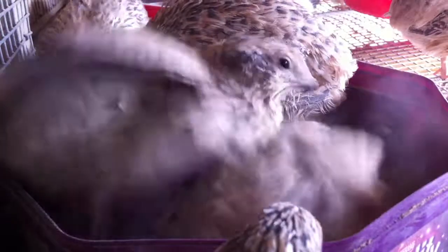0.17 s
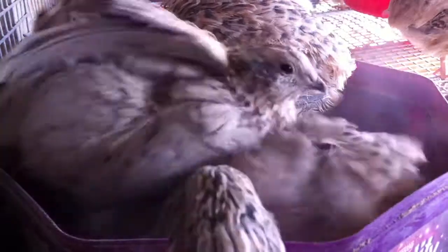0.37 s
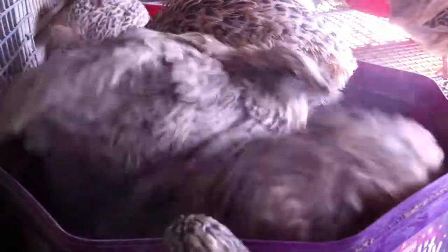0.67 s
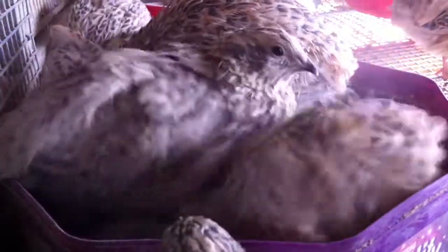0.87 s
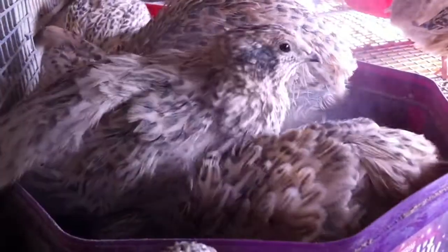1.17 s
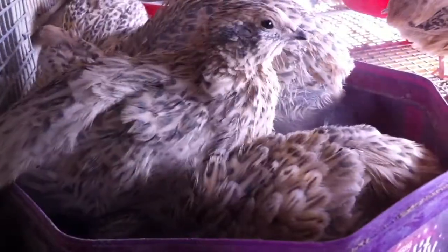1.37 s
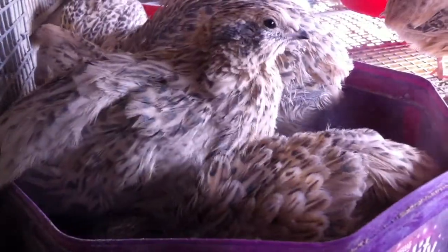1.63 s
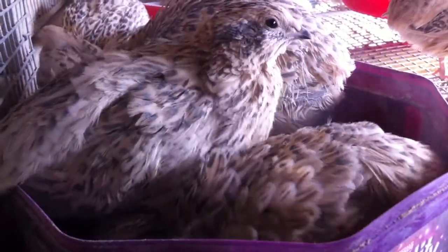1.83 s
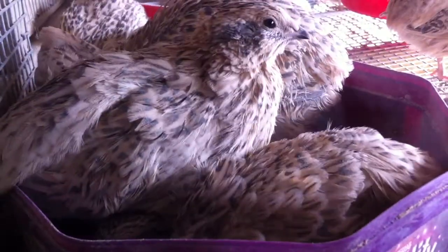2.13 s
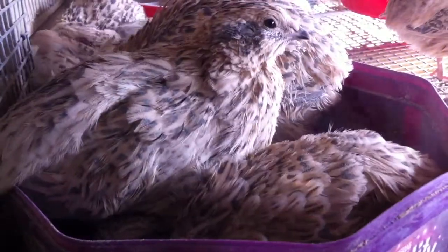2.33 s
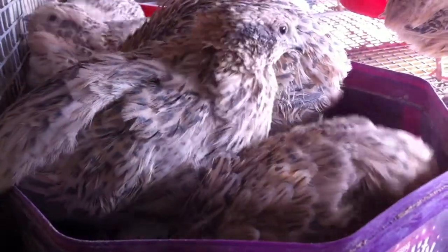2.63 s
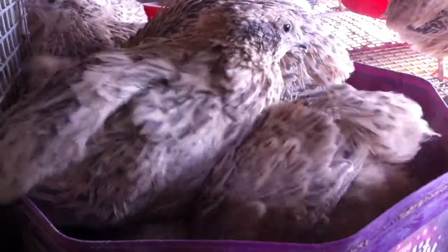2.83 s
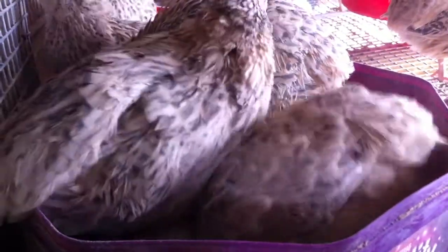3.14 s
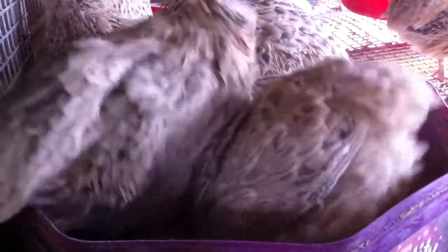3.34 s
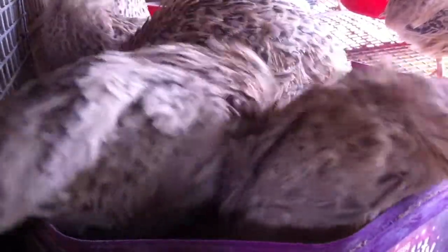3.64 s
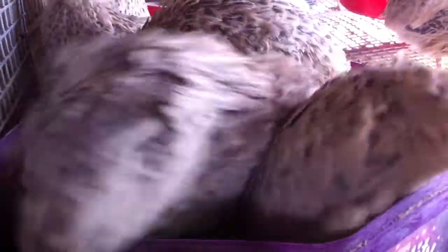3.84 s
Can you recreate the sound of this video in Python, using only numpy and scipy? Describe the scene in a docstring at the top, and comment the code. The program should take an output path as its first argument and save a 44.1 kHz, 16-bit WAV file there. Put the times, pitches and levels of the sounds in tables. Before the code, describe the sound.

Quail claws knock a plastic tub very close by, loudest around 0.1 to 0.35 s, with dry scraping dust and ticking grit continuing unevenly to 1.05 s. Thrown dust patters and fades by 1.5 s. Faint feather brushing follows, with two tiny drooping peeps near 2.25 and 2.35 s. Shuffling resumes from 2.5 s, with clear knocks at 3.0, 3.35 and 3.8 s, over low shed rumble.

```python
"""Claws knock sharply on a plastic tub, close to the microphone, as quail take a quick dust bath.
Dust sweeps and sprays of grit are shaped noise, knocks are short decaying tones with clicks and a dull body,
and thrown dust patters back as grainy noise. A quieter spell of brushing holds two faint, sagging peeps,
then the birds shuffle about, with feathers brushing as bands of grit, more knocks and soft bumps.
The tub rings at its resonances, over the faint stirring of the flock and the low air of the shed."""
import sys
import numpy as np
from scipy import signal
from scipy.fft import rfft, irfft
from scipy.io import wavfile

SR = 44100
rng = np.random.default_rng(int(sys.argv[2]) if len(sys.argv) > 2 else 0)


def transcribe(u):
    """Save the signal u as a 16-bit wav file named by the first command-line argument.

    u: samples, shape (n,) or (channels, n), limited to [-1, 1]; the rate is SR.
    q: integer samples, one column per channel.
    """
    v = np.clip(np.atleast_2d(u).T, -1, 1)
    q = np.round(v * 32767).astype(np.int16)
    wavfile.write(sys.argv[1], SR, q)


N = 176400
TIME = np.arange(N) / SR

# knocks: wall attack, then the claw click's fast decay and its weaker, slower tail
KNOCK_RISE_S, CLICK_T60_S, CLICK_TAIL_DB, CLICK_TAIL_T60_S = 0.00035, 0.014, -27, 0.093
CLAW_SPIKE, CLAW_CRUNCH = 0.25, 0.51  # linear gains
WALL_TOP_RATIO, WALL_HARDNESS = 1.31, 3.7  # both multiply the wall pitch
KNOCK_LOW_CUT_HZ = 226
ROOM_KNOCK_DB, ROOM_T60_S, ROOM_BUILD_S = -8, 0.072, 0.0037
# dust: separate grains, and the unevenness of clumps
GRAINS_PER_S, GRAIN_SPREAD_DB, GRAIN_SHARE = 3500, 3, 0.55  # share of the power
CLUMP_S, CLUMP_DB, SCRAPE_CLUMP_DB, FIZZ_CLUMP_DB = 0.0054, 1.5, 1.4, 1.6
SCRAPE_GRIT, RUSTLE_GRIT = 0.45, 0.6  # linear gains
CRACKLES_PER_S, CRACKLE_DB, CRACKLE_SPREAD_DB, CRACKLE_T60_S = 190, -3, 3, 0.012
SWISH_CATCH_DB, SWISH_CATCH_S = 0.8, 0.0035
# the other sounds
THUD_WIDTH_OCTAVES = 0.42
PEEP_SAG_HZ_PER_S, PEEP_FLUTTER_DB, PEEP_FLUTTER_S = 3400, 1.5, 0.006
TUB_KNOCK_DB, TUB_SWEEP_DB = -6, -5  # how strongly each group drives the tub
STIR_DB, STIR_SWING_DB, STIR_S = -83.5, 7, 0.083  # level of each of three bands
AIR_DB, AIR_DRIFT_DB, AIR_DRIFT_S = -63.5, 1, 0.098
EDGE_HZ = 15850


def amp(db):
    """Decibels to gain."""
    return 10 ** (np.asarray(db) / 20)


def unit(x):
    """Scales to rms 1."""
    return x / np.sqrt(np.mean(x ** 2) + 1e-20)


def add(mix, s, sound):
    """Mixes a sound in at a time in seconds."""
    part = mix[max(round(s * SR), 0):][:len(sound)]
    part += sound[:len(part)]


def spectrum_gain(hz, points):
    """Reads a spectrum's gain between its points, on a log frequency scale."""
    point_hz, point_db = np.transpose(points)
    return amp(np.interp(np.log(hz + 1), np.log(point_hz), point_db))


def colour(x, points):
    """Gives a signal a spectrum, at rms 1."""
    f = np.fft.rfftfreq(len(x), 1 / SR)
    return unit(irfft(rfft(x) * spectrum_gain(f, points), len(x)))


def band(x, hz, width):
    """One broad band, width in octaves, at rms 1."""
    f = np.fft.rfftfreq(len(x), 1 / SR) + 1
    skirt = (1 + 0.5 * (np.log2(f / hz) / width) ** 2) ** 2
    return unit(irfft(rfft(x) / skirt, len(x)))


def wander(span_s):
    """Smooth chance, at rms 1, that changes over about the given span."""
    f = np.fft.rfftfreq(N, 1 / SR)
    slow = np.exp(-(2 * f * span_s) ** 2)
    return unit(irfft(rfft(rng.standard_normal(N)) * slow, N))


def swell(peak, rise, fall):
    """Envelope that climbs 20 dB in the rise time and drops 20 dB in the fall time."""
    before = np.maximum((peak - TIME) / rise, 0) ** 0.92
    after = (TIME - peak) / fall
    return amp(-20 * np.maximum(before, after))


def grit():
    """Dust grains of uneven size over a smooth hiss."""
    struck = rng.random(N) < GRAINS_PER_S / SR
    size_db = GRAIN_SPREAD_DB * np.minimum(rng.exponential(1, N), 4)
    grains = struck * rng.choice([-1, 1], N) * amp(size_db)
    return np.sqrt(GRAIN_SHARE) * unit(grains) + np.sqrt(1 - GRAIN_SHARE) * rng.standard_normal(N)


def crackle():
    """Coarse clods burst one after another, each a sudden, short spray of decaying noise."""
    gaps = rng.uniform(0.3, 1.7, size=2000) / CRACKLES_PER_S
    at = (np.cumsum(gaps) * SR).astype(int)
    strength = amp(CRACKLE_SPREAD_DB * rng.uniform(-0.83, 1, len(at)))
    bursts = np.bincount(at, strength, N)[:N]
    decay = amp(-60 / (CRACKLE_T60_S * SR))
    return unit(signal.lfilter([1], [1, -decay], bursts) * rng.standard_normal(N))


def spike(points, size=4096):
    """A single sharp, minimum-phase impulse with the given spectrum, peak 1."""
    log_gain = np.log(spectrum_gain(abs(np.fft.fftfreq(size, 1 / SR)), points))
    pulse = np.fft.ifft(np.exp(np.conj(signal.hilbert(log_gain)))).real
    return pulse / abs(pulse).max()


def reflections(x):
    """Dense, short echoes from the tub and the cage, drawn afresh for every blow."""
    t = np.arange(len(x)) / SR
    build = 1 - np.exp(-(t / ROOM_BUILD_S) ** 2)
    taps = rng.standard_normal(len(t)) * build * amp(-60 * t / ROOM_T60_S)
    return signal.fftconvolve(x, taps / np.linalg.norm(taps))[:len(x)]


def knocks():
    """Each blow is a short wall tone with a sharp click and a crunch; the knocks are thin in the bass."""
    # claws and bodies knock the tub, and coarse grit ticks against it: start_s, level_db,
    # wall_pitch_hz, ring_t60_s, click_db (relative to the wall, ahead of the claw gains)
    blows = [(.015, -41.5, 1110, 0.024, -11), (0.029, -39, 1320, 0.021, -6.5),
             (0.0818, -19.5, 1054, 0.0061, -5.5), (.0848, -35.5, 930, 0.0091, -10),
             (.0925, -33.5, 626, 0.01, -12), (0.1012, -42, 900, 0.0066, -1), (.171, -36, 1340, 0.0099, -12),
             (.2063, -27, 1370, 0.0044, -1.5), (0.2098, -22.5, 1090, 0.0089, -12.5),
             (0.288, -36, 1320, 0.011, -11), (0.3159, -29, 1230, 0.0068, -7.5),
             (.3205, -32, 650, 0.012, -9.5), (.3325, -32.5, 2260, 0.0042, -0.5),
             (.403, -34, 830, 0.011, -13), (.422, -35, 1090, 0.0078, -12), (.4775, -45, 740, 0.02, -6),
             (0.4978, -39, 1220, .012, -4.5), (.5792, -30, 820, 0.015, -15), (0.654, -46, 900, .018, -4),
             (0.794, -43, 444, 0.047, 0), (0.8095, -41, 1080, 0.015, -5.5), (0.8597, -46.5, 1260, 0.018, 2),
             (0.9301, -39.5, 710, 0.0082, -8.5), (1.005, -33.5, 1460, 0.0057, -18),
             (1.0278, -35.5, 1320, 0.013, 0.5), (1.034, -44, 604, 0.0031, -4),
             (1.171, -35.5, 750, 0.0089, -18), (1.184, -36, 630, 0.0027, -22),
             (2.480, -36.5, 790, 0.0073, -10), (2.6882, -35, 1180, 0.012, -34),
             (2.6968, -39, 1100, 0.0074, -29), (2.7503, -42.5, 612, 0.038, -19),
             (2.7625, -46, 676, 0.021, -19), (2.9813, -49, 1000, 0.01, -21),
             (3.0146, -24.5, 1160, 0.011, -19), (3.025, -37.5, 1040, 0.0052, -9.5),
             (3.189, -49, 1390, .008, -1), (3.199, -49, 1070, 0.024, -13), (3.340, -27, 2210, 0.0019, -6),
             (3.801, -37, 1070, 0.0044, -4.5), (3.8036, -28, 658, 0.021, -9),
             (3.8135, -50, 686, 0.017, -22), (3.842, -51, 710, 0.032, -30),
             (3.879, -45.5, 990, 0.017, -3.5)]
    # click spectrum: frequency_hz, density_db (per Hz, relative)
    click_spectrum = [(100, -78), (800, 14), (1600, -2.5), (2900, 2.5), (3600, -8), (4400, -3.5),
                      (5900, -3.5), (7000, -12.5), (10000, -12), (16000, -27)]
    out, t = np.zeros(N), np.arange(8192) / SR
    snap = amp(-60 * t / CLICK_T60_S) + amp(CLICK_TAIL_DB - 60 * t / CLICK_TAIL_T60_S)
    claw = CLAW_SPIKE * spike(click_spectrum, size=len(t))
    for s, db, hz, t60, click_db in blows:
        flex = (1 - np.exp(-(t / KNOCK_RISE_S) ** 2)) * amp(-60 * t / t60)
        tone = -flex / flex.max() * np.sin(2 * np.pi * hz * t)
        # a harder contact starts more sharply
        top_hz = hz * (WALL_TOP_RATIO + WALL_HARDNESS * amp(click_db) ** 2)
        soften = signal.butter(N=8, Wn=min(top_hz, SR / 3), fs=SR)
        wall = signal.lfilter(*soften, tone)
        crunch = CLAW_CRUNCH * snap * colour(rng.standard_normal(len(t)), click_spectrum)
        blow = amp(db) * (wall + amp(click_db) * (claw + crunch))
        add(out, s, blow + amp(ROOM_KNOCK_DB) * reflections(blow))
    return signal.lfilter(*signal.butter(2, KNOCK_LOW_CUT_HZ, "high", fs=SR), out)


def thuds():
    """The low, dull body of the harder knocks, and soft bumps, as swells of narrow-band noise."""
    # low body of the harder knocks, and soft bumps: peak_s, rise_s, fall_s, level_db, centre_hz
    low_bodies = [(0.083, 0.002, 0.027, -36, 605), (0.219, 0.0059, 0.018, -42, 460),
                  (0.325, 0.023, 0.03, -47.5, 207), (.415, 0.069, 0.11, -51, 178),
                  (.80, 0.021, 0.015, -59, 375), (1.181, 0.011, 0.038, -57, 378),
                  (2.487, 0.025, 0.058, -57, 347), (2.704, 0.08, 0.016, -51.5, 476),
                  (2.759, 0.031, 0.029, -53.5, 263), (2.842, 0.0095, 0.023, -57.5, 223),
                  (3.024, 0.0099, 0.033, -43.5, 480), (3.806, 0.0055, 0.017, -40.5, 301)]
    push = rng.standard_normal(N)
    return sum(amp(db) * swell(s, rise, fall) * band(push, hz, THUD_WIDTH_OCTAVES)
               for s, rise, fall, db, hz in low_bodies)


def sweeps():
    """Dust scrapes, rustles and fizzes as three swelling layers of noise, roughened by clumps of grit."""
    # wings and feet sweep the dust, with brief ticks and sprays of grit:
    # peak_s, rise_s, fall_s, scrape_db, rustle_db, fizz_db
    dust_swells = [(0.032, 0.27, 0.019, -51.5, -60.5, -56), (0.146, 0.15, 0.27, -54, -61, -60),
                   (0.287, 0.077, 0.12, -56, -61, -66), (0.318, 0.0045, 0.047, -41.5, -47.5, -60),
                   (.348, 0.036, 0.029, -51.5, -57.5, -57.5), (.415, 0.018, 0.1, -44.5, -64, -62),
                   (0.459, 0.072, 0.027, -66, -55, -52.5), (0.4775, 0.0015, 0.048, -46, -50, -48.5),
                   (0.554, 0.002, 0.035, -49, -56, -61), (.567, 0.0092, 0.059, -47.5, -60, -67),
                   (0.59, 0.026, 0.12, -56, -56.5, -57.5), (.635, 0.0077, 0.0065, -69, -50.5, -53),
                   (0.677, 0.033, 0.027, -53, -68, -68), (0.765, 0.039, 0.045, -51.5, -63, -64),
                   (.803, 0.053, 0.048, -49, -55.5, -59), (0.841, 0.045, .015, -81, -56.5, -67),
                   (0.858, 0.0022, 0.0094, -52, -60, -49.5), (.87, 0.016, 0.084, -60, -69, -70),
                   (0.948, 0.047, 0.04, -45, -58.5, -66), (.966, 0.024, 0.043, -61, -53.5, -57),
                   (1.029, .001, 0.011, -40.5, -38.5, -60), (1.045, .015, 0.2, -57, -77, -63),
                   (1.19, .04, 0.038, -62, -74, -90), (2.555, 0.016, 0.037, -62, -63, -64.5),
                   (2.63, 0.08, 0.23, -60, -67.5, -75), (2.79, 0.11, 0.24, -71, -74.5, -68),
                   (2.949, 0.03, 0.093, -64.5, -77, -76), (3.12, 0.11, 0.2, -63.5, -67.5, -65),
                   (3.44, 0.049, 0.09, -54.5, -67, -64.5), (3.207, 0.13, 0.24, -54, -64.5, -74),
                   (3.345, 0.072, 0.05, -54, -75, -98), (3.506, 0.019, 0.017, -58, -62.5, -60),
                   (3.539, 0.014, 0.067, -64.5, -68, -69), (3.679, 0.019, 0.03, -67, -71, -70.5),
                   (3.801, 0.11, 0.051, -61.5, -67, -64.5), (3.895, 0.11, 0.095, -60, -68.5, -75),
                   (3.99, 0.047, 0.091, -61, -65, -64)]
    # spectra of tub scrape, rustle and fine fizz: frequency_hz, density_db (per Hz, relative)
    scrape_spectrum = [(60, -21), (250, -11.5), (430, -3.5), (610, 1.5), (760, -3), (1070, -2), (1400, 0),
                       (1850, -8.5), (2700, -24.5), (4000, -19), (16000, -72)]
    rustle_spectrum = [(200, -50), (1200, -23), (2500, 10.5), (3400, 2.5), (4300, 1.5), (5900, -5.5),
                       (7200, -13.5), (16000, -19)]
    fizz_spectrum = [(1000, -56), (5000, 7), (7500, 1), (10700, 3.5), (13000, -2), (16000, -0.5)]
    clods = amp(CRACKLE_DB) * crackle()
    scrape = colour(rng.standard_normal(N) + SCRAPE_GRIT * grit() + clods, scrape_spectrum)
    scrape *= unit(amp(SCRAPE_CLUMP_DB * wander(CLUMP_S)))
    rustle = colour(RUSTLE_GRIT * grit() + clods, rustle_spectrum)
    rustle *= unit(amp(CLUMP_DB * wander(CLUMP_S)))
    fizz = colour(grit(), fizz_spectrum)
    fizz *= unit(amp(FIZZ_CLUMP_DB * wander(CLUMP_S)))
    layers = np.array([scrape, rustle, fizz])
    return sum(swell(peak, rise, fall) * (amp(levels_db) @ layers)
               for peak, rise, fall, *levels_db in dust_swells)


def dust_fall():
    """Thrown dust patters down as coloured grit that follows an uneven, fading level."""
    # level of the falling dust, silent outside these points: time_s, level_db
    fall_levels = [(1.0, -66), (1.05, -56.5), (1.13, -57.5), (1.21, -60.5), (1.26, -69), (1.38, -67.5),
                   (1.55, -79)]
    # spectrum of the patter: frequency_hz, density_db (per Hz, relative)
    dust_spectrum = [(100, -12), (450, 6), (1400, 3.5), (2000, 2.5), (4000, 0), (5500, -4), (6150, 1.5),
                     (6700, -18), (16000, -12)]
    s, db = np.transpose(fall_levels)
    return colour(grit(), dust_spectrum) * amp(np.interp(TIME, s, db, left=-120, right=-120))


def brushes():
    """Feather barbs slide over each other in one broad band, catching unevenly."""
    # feathers brush feathers: peak_s, rise_s, fall_s, level_db, centre_hz, width_octaves
    strokes = [(1.335, .03, 0.027, -62, 1500, 1), (1.39, 0.049, .08, -66, 7850, 1),
               (1.77, 0.3, 0.14, -71, 2370, 0.93), (1.95, .02, 0.079, -67, 2430, 1),
               (2.42, 0.24, 0.31, -66.5, 1970, 0.72), (2.559, 0.014, 0.024, -58, 3470, 0.36),
               (2.623, .003, 0.096, -55, 2120, 0.64), (2.795, 0.022, 0.067, -68.5, 12100, 0.2),
               (3.434, 0.02, 0.022, -55.5, 6500, 0.94), (3.341, 0.0057, 0.032, -51.5, 2660, 1),
               (3.456, 0.032, 0.029, -51.5, 2640, .45)]
    barbs = grit() * amp(CLUMP_DB * wander(CLUMP_S))
    return sum(amp(db) * swell(s, rise, fall) * band(barbs, hz, width)
               for s, rise, fall, db, hz, width in strokes)


def swishes():
    """Grit noise passes through one gliding resonance, its level flickering."""
    # falling dust and brushing feathers hiss in a narrow band that glides in pitch: peak_s, rise_s,
    # fall_s, level_db, centre_hz (at the peak), glide_octaves_per_s, width_hz
    glides = [(1.12, 0.11, .15, -74, 6140, -.3, 380), (1.34, 0.045, 0.069, -75, 5600, -3, 500),
              (1.846, .03, .05, -70, 1960, -2, 420), (2.11, .035, .06, -76, 5680, -2, 450),
              (2.33, .035, 0.068, -72, 4360, 4, 520), (2.415, 0.051, 0.067, -66, 1390, 2, 240),
              (2.462, 0.024, .05, -70, 2700, -8, 300), (3.444, 0.015, 0.03, -50.5, 4030, -12, 1200)]
    out = np.zeros(N)
    for s, rise, fall, db, hz, glide, width_hz in glides:
        centre_hz = hz * 2 ** (glide * (np.clip(TIME, s - rise, s + fall) - s))
        # shift the gliding centre to 0 Hz, filter there, shift back
        turn = np.exp(2j * np.pi * np.cumsum(centre_hz) / SR)
        r = np.exp(-np.pi * width_hz / SR)
        hiss = (turn * signal.lfilter([1], [1, -2 * r, r * r], grit() / turn)).real
        flicker = amp(SWISH_CATCH_DB * wander(SWISH_CATCH_S))
        out += amp(db) * swell(s, rise, fall) * unit(hiss * flicker)
    return out


def peeps():
    """Short, slightly unsteady sine notes that sag in pitch."""
    # soft contact peeps: start_s, length_s, level_db (before the flutter), pitch_hz (at the start)
    calls = [(2.232, 0.042, -58, 1196), (2.326, 0.03, -60, 1206)]
    out = np.zeros(N)
    for s, length, db, hz in calls:
        t = np.arange(0, length, 1 / SR)
        phase = 2 * np.pi * np.cumsum(hz - PEEP_SAG_HZ_PER_S * t) / SR
        add(out, s, amp(db) * np.sin(np.pi * t / length) * np.sin(phase))
    return out * unit(amp(PEEP_FLUTTER_DB * wander(PEEP_FLUTTER_S)))


def tub(x):
    """The plastic tub rings on at its resonances, each a decaying cosine."""
    # tub resonances: frequency_hz, level_db, t60_s
    modes = [(419, 2, 0.085), (603.2, 2, 0.12), (1011, 2.5, 0.059), (1180, -46, .08), (1327, -5, 0.061),
             (1740, -41, .055), (2420, -13, 0.069), (2820, -5, 0.045), (4235, 2, 0.033), (6200, -8, .04)]
    t = np.arange(8192) / SR
    ring = np.zeros(len(t))
    for hz, db, t60 in modes:
        peak_gain = 2 * np.log(1000) / (t60 * SR)  # evens out long and short rings at resonance
        ring += amp(db - 60 * t / t60) * np.cos(2 * np.pi * hz * t) * peak_gain
    return signal.fftconvolve(x, ring)[:N]


def stirring():
    """Faint, uneven rustles of the resting flock, in three bands of grit that swell separately."""
    return sum(amp(STIR_DB) * unit(amp(STIR_SWING_DB * wander(STIR_S))) * band(grit(), hz, 0.99)
               for hz in (1100, 2000, 4200))


def air():
    """Low rumble and hiss of the shed: coloured noise that drifts slightly in level."""
    # spectrum of the shed air: frequency_hz, density_db (per Hz, relative)
    air_spectrum = [(25, -23.5), (60, -27), (90, -12.5), (125, 1), (170, 3.5), (250, -1), (400, -9),
                    (620, -10), (900, -14.5), (2000, -20), (4000, -21.5), (8000, -25.5), (15500, -26.5)]
    level = amp(AIR_DB + AIR_DRIFT_DB * wander(AIR_DRIFT_S))
    return level * colour(rng.standard_normal(N), air_spectrum)


def scene():
    """Knocks, rustling and peeps, coloured by the tub, with thuds over the quiet shed."""
    hits = knocks()
    soft = sweeps() + dust_fall() + brushes() + swishes() + peeps() + stirring()
    ring = tub(amp(TUB_KNOCK_DB) * hits + amp(TUB_SWEEP_DB) * soft)
    return (hits + soft + ring + thuds() + air())[None]


def record(dry):
    """Steep low-pass that limits the treble."""
    low_pass = signal.firwin(511, EDGE_HZ, window=("kaiser", 9), fs=SR)
    return signal.oaconvolve(dry, low_pass[None], "same")


dry = scene()
out = record(dry)
transcribe(out)
```